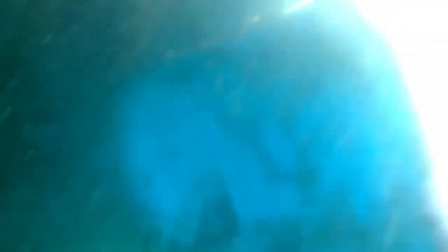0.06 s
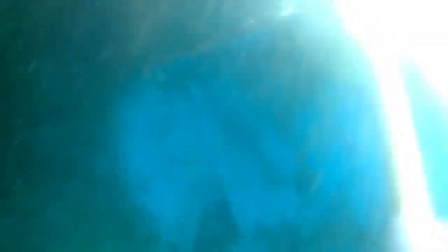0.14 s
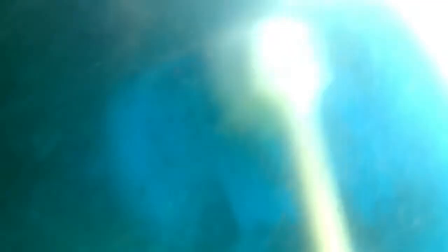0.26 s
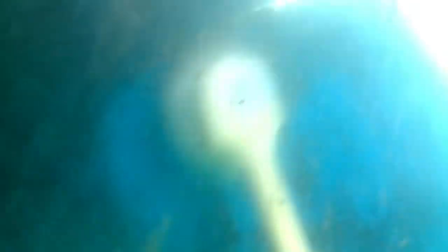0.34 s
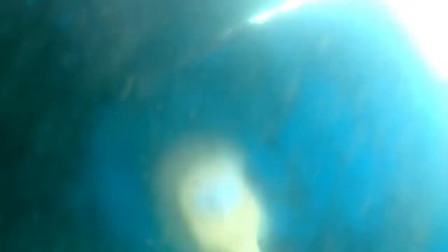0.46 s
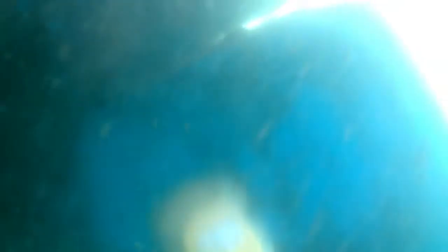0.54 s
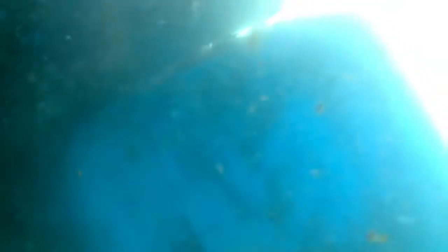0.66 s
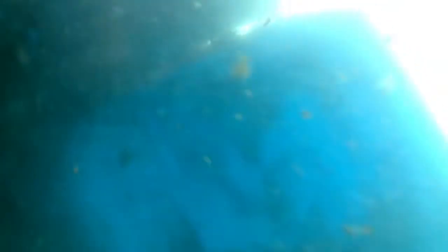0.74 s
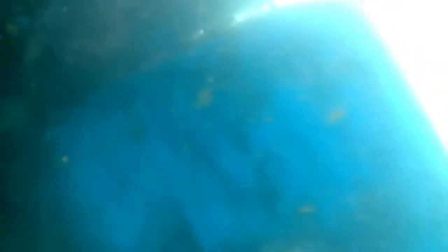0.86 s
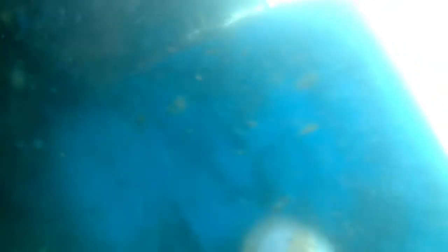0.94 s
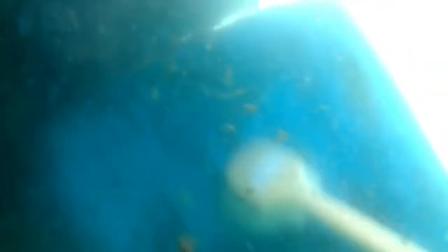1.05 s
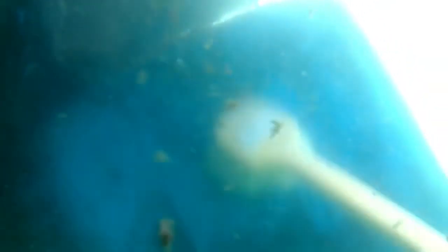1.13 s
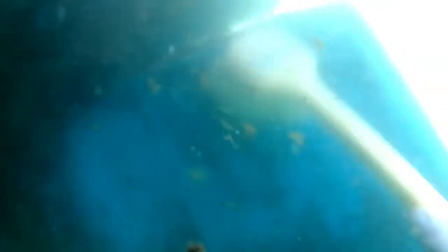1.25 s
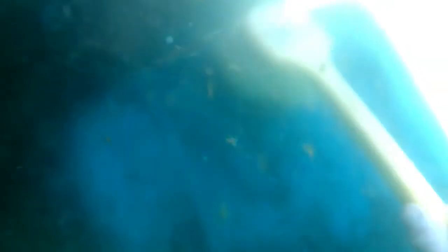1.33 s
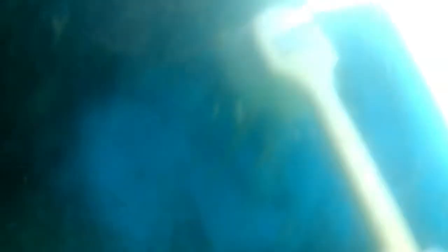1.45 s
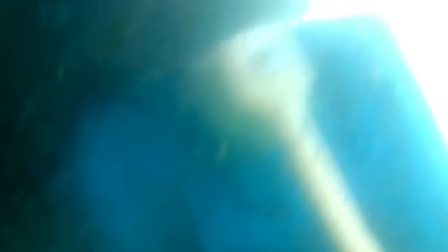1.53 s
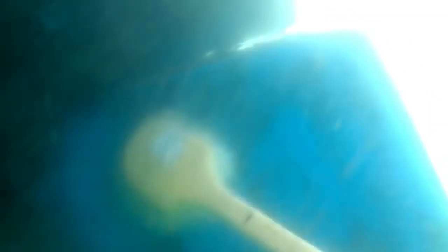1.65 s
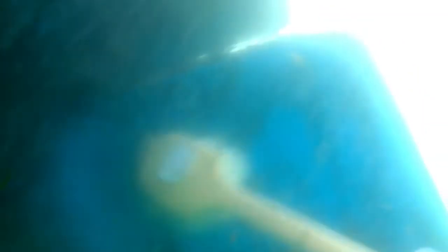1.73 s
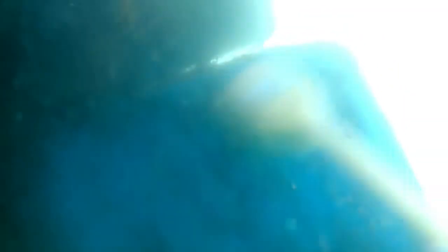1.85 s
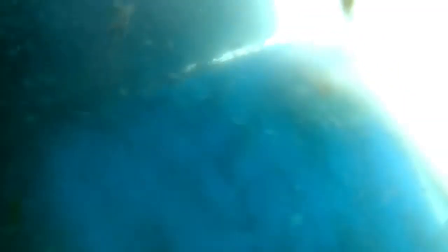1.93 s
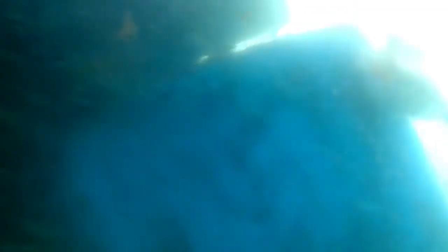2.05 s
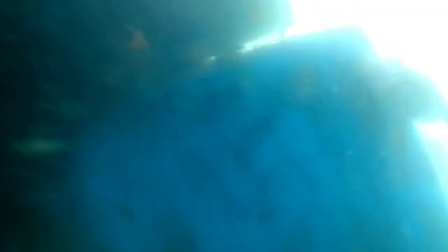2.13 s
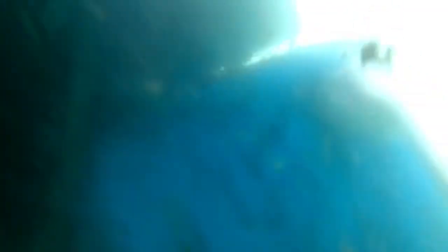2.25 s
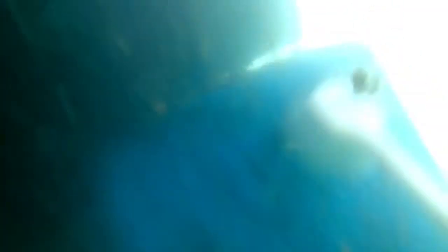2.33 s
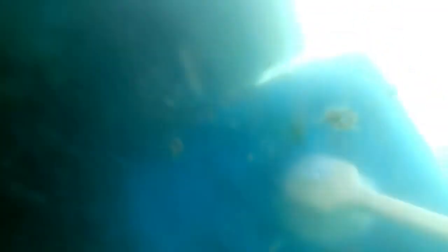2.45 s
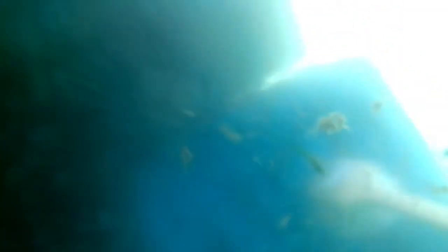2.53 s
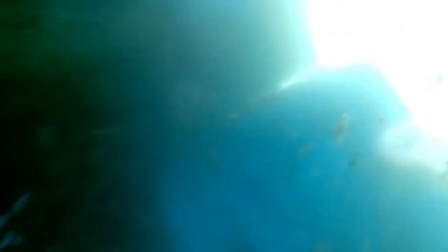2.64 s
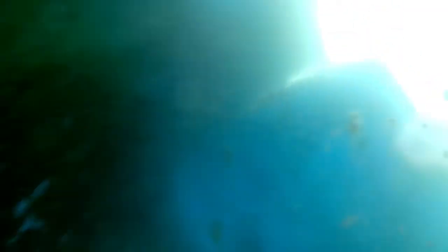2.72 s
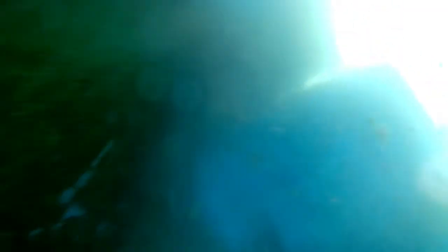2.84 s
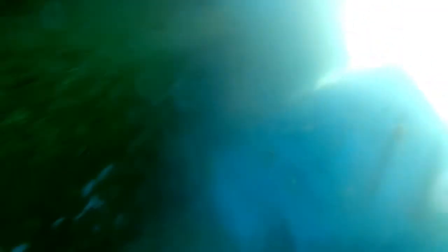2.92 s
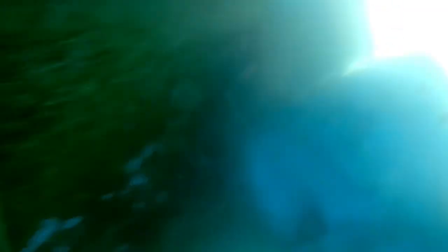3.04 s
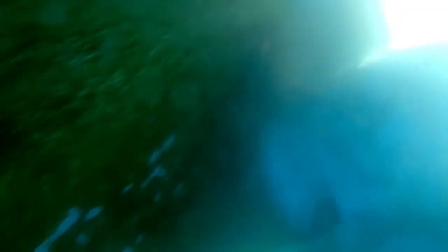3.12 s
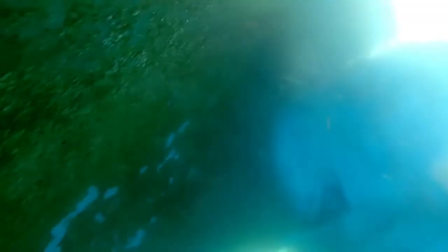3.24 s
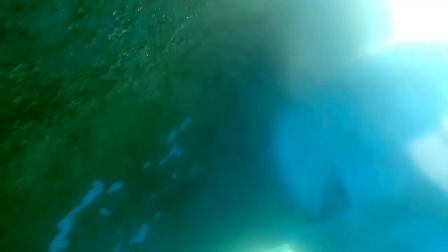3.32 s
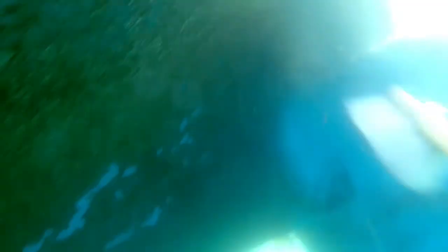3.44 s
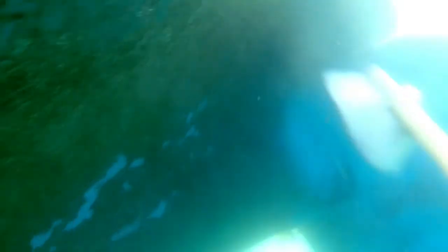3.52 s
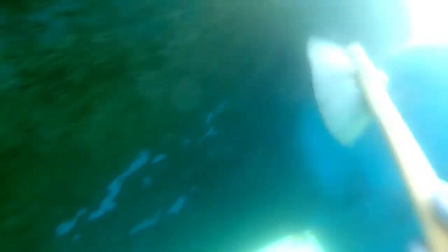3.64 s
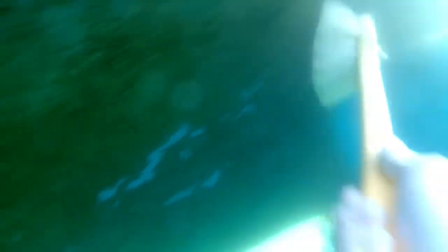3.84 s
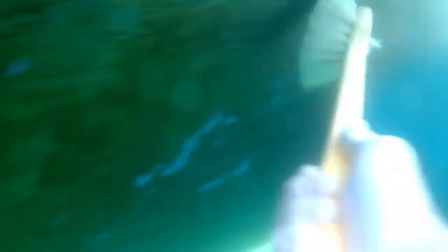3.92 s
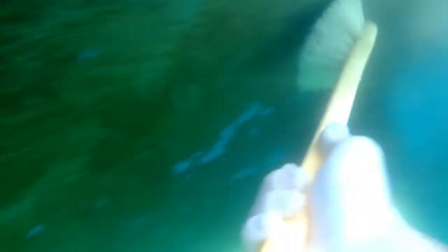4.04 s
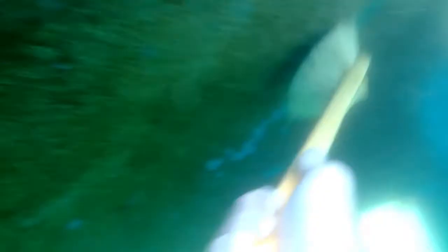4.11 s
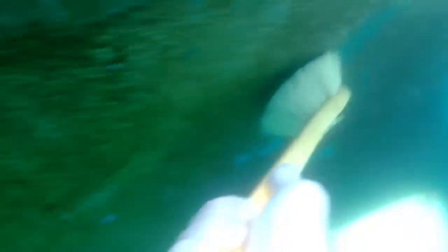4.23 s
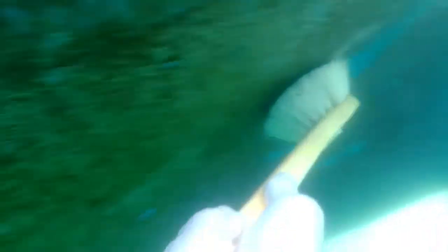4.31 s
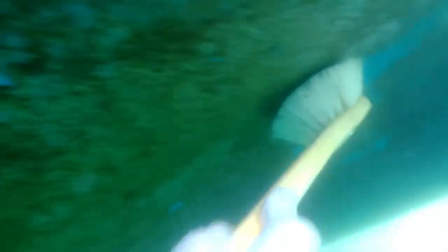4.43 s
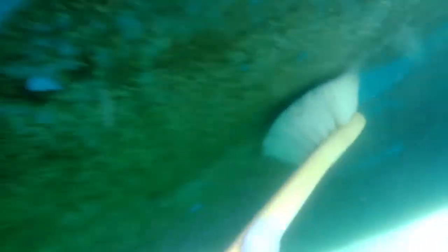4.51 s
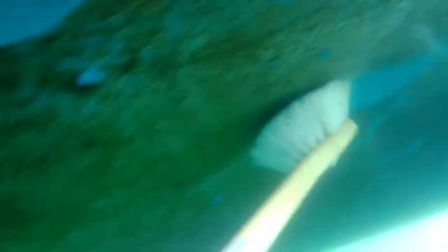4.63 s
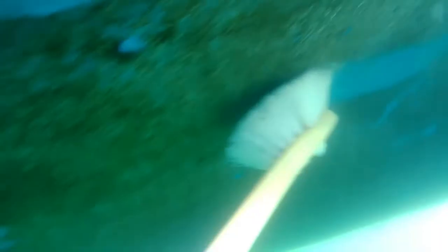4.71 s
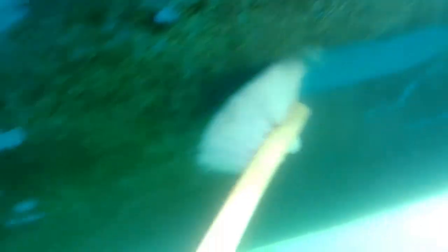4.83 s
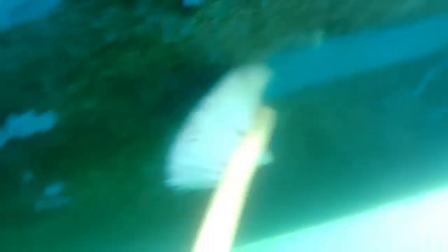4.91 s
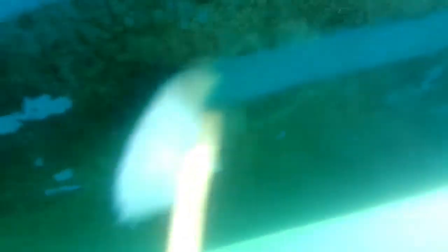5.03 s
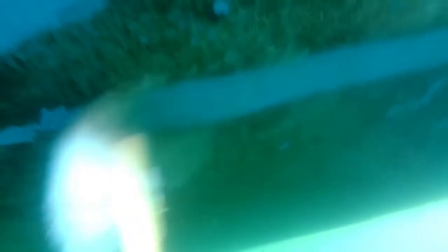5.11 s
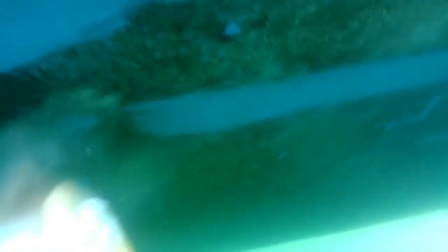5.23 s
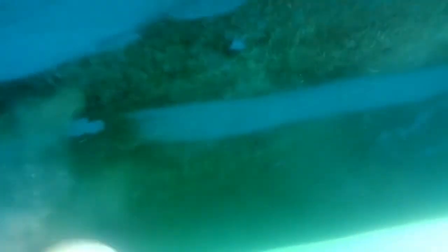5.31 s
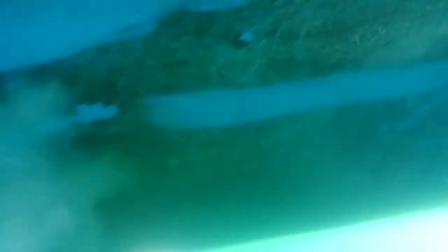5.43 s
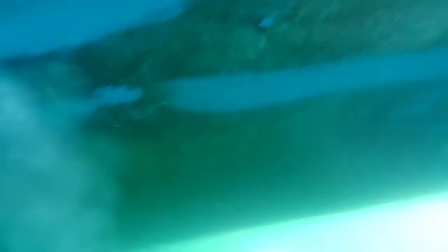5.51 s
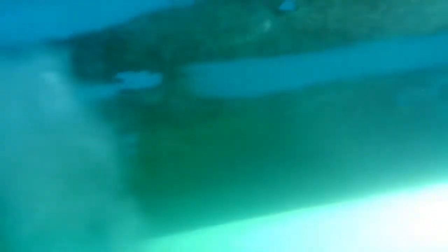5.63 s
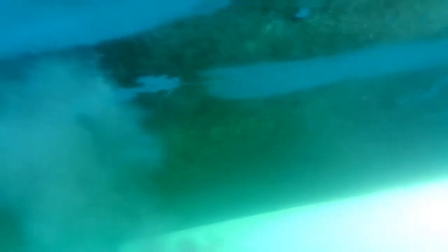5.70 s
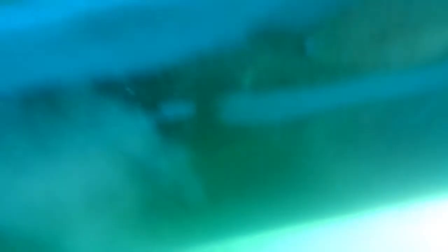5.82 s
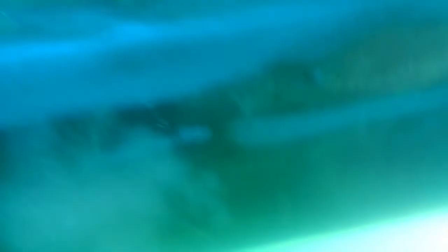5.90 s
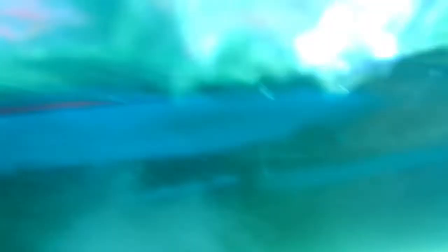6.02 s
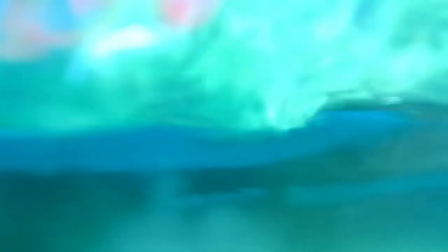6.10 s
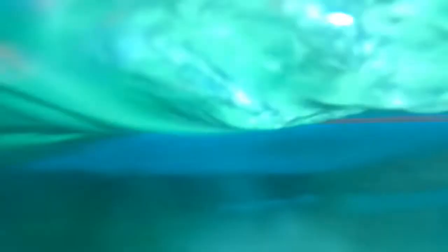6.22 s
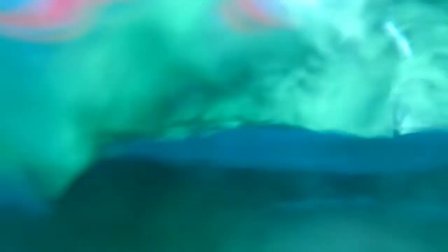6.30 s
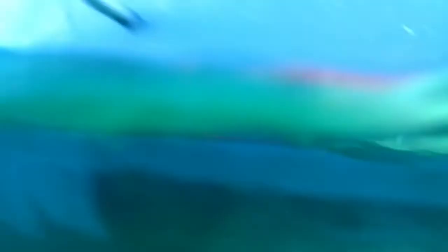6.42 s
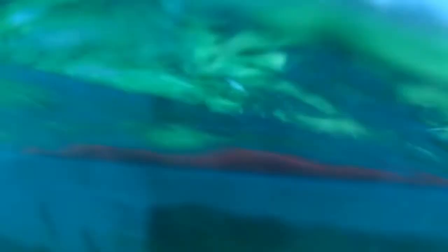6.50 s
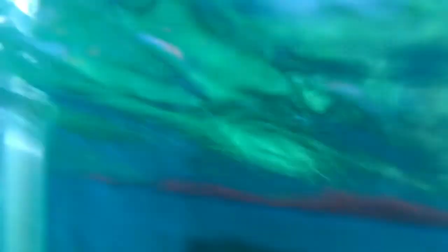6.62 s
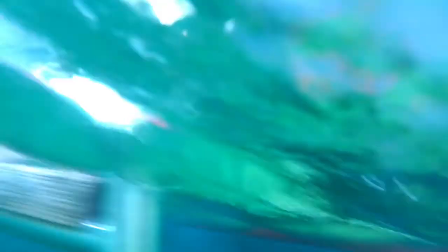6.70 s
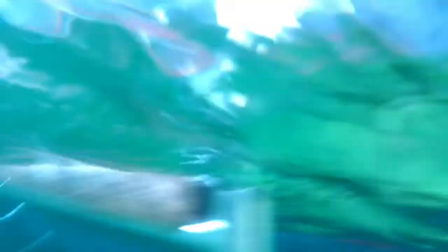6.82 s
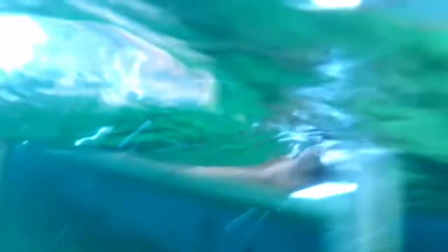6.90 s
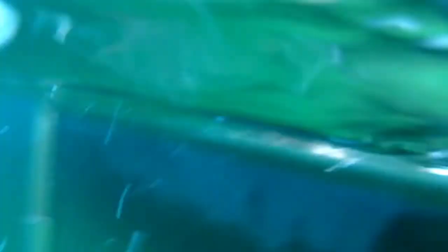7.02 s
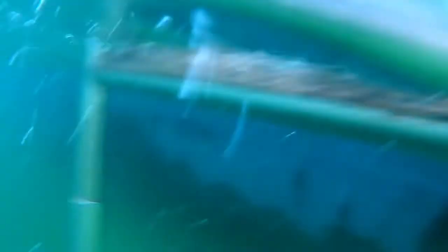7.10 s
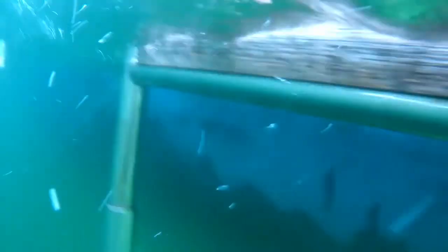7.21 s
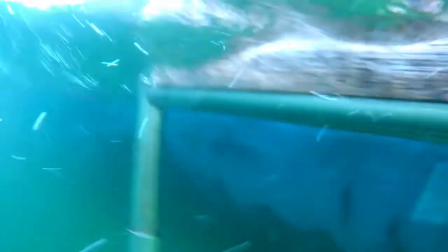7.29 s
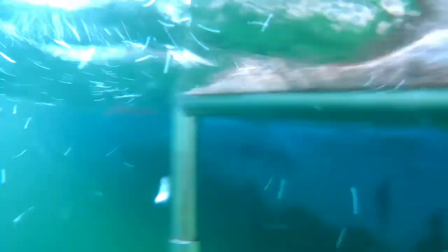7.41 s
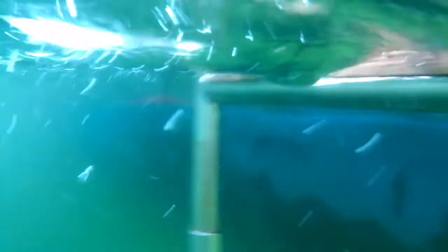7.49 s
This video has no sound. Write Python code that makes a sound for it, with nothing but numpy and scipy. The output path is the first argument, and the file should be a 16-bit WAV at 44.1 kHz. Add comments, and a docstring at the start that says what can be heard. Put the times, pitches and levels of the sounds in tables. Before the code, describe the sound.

From the start, a low, uneven pressure rumble sways against a camera housing underwater. A hand brush swishes dully over a boat hull from 0.1 to 0.6 s, with faint grainy hiss, a soft shove, a round bubble note at 0.2 s and light bumps to 0.65. A fainter stroke follows from 1 to 1.8 s, then near quiet. Around 2.6-2.9 s come small ticks, thuds and crunchy scrapes; longer soft strokes run from 3 to 4.4 s with low bubble blips. Light knocks and weak hiss occur at 4.5-5.4 s. From 5.7 s waves slosh and spray over the rising camera, with a sharp knock and slam at 6.07. The loudest burst of hard clacks, slosh and drops hits at 6.6-6.7 s. It ebbs, then slaps and a bright crack land at 7.2-7.3 s, with high bubble pings and fading froth. Everything is boxy and muffled, with thin mirrored treble sizzle.

```python
"""A hand brush scrubs a boat hull in spells, heard from a small camera under water that then rises to the surface.
From the start bristle grains swish and hiss, scrapes crunch, bubbles ring and water sways against the housing.
Blows set the housing's modes clacking: a few knocks early on, and the loudest late, among the breaking waves.
Those late waves bring slosh, bursting drops and tinkling froth.
Throughout, the camera holds each sample at 8 kHz, mirroring the dull sound into a thin treble sizzle."""
import sys
import numpy as np
from scipy import signal
from scipy.fft import rfft
from scipy.io import wavfile

SR = 44100
rng = np.random.default_rng(int(sys.argv[2]) if len(sys.argv) > 2 else 0)


def wrap_up_sound(samples):
    """Save the sound to the file named by the first command line argument, as 16-bit audio."""
    columns = np.atleast_2d(samples).T
    # keep every value between -1 and 1, then stretch to whole-number steps
    tamed = np.clip(columns, -1, 1)
    steps = np.round(tamed * 32767).astype(np.int16)
    wavfile.write(sys.argv[1], SR, steps)


N = 332953
T = np.arange(N) / SR

# strength of the flow past the moving camera: (time [s], relative level [dB])
FLOW = [(0, -20), (0.15, -25), (0.33, -32), (0.57, -25), (0.92, -31.5), (1.17, -27), (2.45, -32.5),
        (3.05, -26), (4.3, -31.5), (4.6, -25.5), (5.33, -29.5), (5.62, -21), (5.9, -20.5), (6.02, -13.5),
        (6.2, -29), (6.5, -22.5), (6.65, -22.5), (7.55, -25.5)]
# colour of the slow pressure swings: (frequency [Hz], relative level [dB])
SWAY_COLOUR = [(3, -19), (8, 1.5), (14, 8), (24, -4), (40, -9), (65, -24), (120, -36.5), (250, -57)]
# colour of the small eddies: (frequency [Hz], relative level [dB])
EDDY_COLOUR = [(40, -4.5), (70, 12), (130, 0.5), (230, -2.5), (400, -21)]
SWAY_DB = 4  # pressure swings, relative to the flow
# eddy level at a usual flow [dB], that flow [dB], and eddy dB gained per dB of flow
EDDY_DB, EDDY_FLOW_DB, EDDY_GROWTH = -47.5, -27, 1.54

# waves breaking over the camera:
# (start [s], relative slosh level [dB], relative spray level [dB], rise [s], decay time constant [s])
WAVES = [(5.728, -39, -40.5, 0.046, 0.29), (5.87, -42, -37.5, 0.019, 0.095),
         (6.0, -33.5, -34.5, 0.054, 0.2), (6.195, -36.5, -40, 0.028, 0.18),
         (6.59, -23.5, -32.5, 0.028, 0.074), (6.735, -30.5, -53.5, 0.034, 0.19),
         (7.13, -34, -40, 0.11, 0.1), (7.49, -50.5, -62, 0.03, 0.15)]
# colour of the sloshing water: (frequency [Hz], relative level [dB])
SLOSH_COLOUR = [(120, -42.5), (200, -6.5), (295, -8), (381, -1), (426, -5), (542, 6.5), (654, -17.5),
                (705, -24.5), (1050, -27), (1200, -39), (1560, -45), (2640, -120)]
# colour of the bursting drops: (frequency [Hz], relative level [dB])
SPRAY_COLOUR = [(470, 15), (800, 4.5), (907, 6.5), (1230, -14), (1330, 8.5), (1490, -40), (1750, 8),
                (2120, -46.5), (2440, -11.5), (3420, -14.5), (3900, -36), (5070, -44.5), (8580, -120)]

# shoves of water on the housing: (time of the slam [s], relative level [dB], time constant [s])
SHOVES = [(0.153, -11, 0.011), (4.538, -9.5, 0.0031), (5.254, -24, 0.0023), (6.067, -3, 0.0019),
          (6.648, -7.5, 0.0068), (7.221, -2.5, 0.0018)]
# single bubbles: (start [s], peak level [dB], starting pitch [Hz], life [s], pitch rise per life [share])
BUBBLES = [(0.155, -26.5, 444, 0.021, .02), (0.204, -10.5, 462, 0.027, 0.005),
           (1.04, -39, 539, 0.025, 0.012), (1.70, -38, 190, 0.039, 0.034), (1.88, -41, 142, 0.042, 0.037),
           (2.775, -30.5, 174, 0.038, 0.025), (2.982, -39.5, 675, 0.011, 0.04),
           (3.293, -21.5, 94.3, 0.033, 0.036), (3.906, -24.5, 493, 0.018, 0.036),
           (4.211, -33, 617, 0.019, 0.049), (5.899, -27, 670, 0.013, 0.014),
           (6.621, -24, 588, 0.039, 0.013), (6.645, -5, 846, 0.004, 0.024),
           (6.734, -20.5, 418, 0.006, 0.026), (6.825, -27.5, 375.4, 0.038, 0.014),
           (7.253, -26.5, 1825, 0.0082, 0.041), (7.327, -35, 1720, 0.012, 0.015),
           (7.362, -36, 1065, 0.035, 0.12)]

# knocks and slaps on the housing: (start [s], relative level [dB],
# contact frequency [Hz], low is a soft bump and high a hard tick, length [factor], splash [share of power, 0-1])
KNOCKS = [(0.096, -33, 170, 1, 0.3), (0.506, -25, 108.3, 0.45, 0), (0.632, -31, 130, 0.71, 0.8),
          (2.319, -43.5, 2800, 0.91, 0.7), (2.621, -37, 1670, 1, 0.03), (2.751, -38, 1540, 0.99, 0.75),
          (2.769, -22.5, 250, 0.48, 0.16), (2.794, -24, 150, 1, 0.12), (2.841, -41, 1900, 1, 0.47),
          (2.904, -49, 2400, 0.56, 0.2), (4.5, -29, 4080, 0.6, 0.14), (4.899, -32.5, 330, .95, 0.22),
          (4.926, -43, 4000, 0.74, .6), (5.231, -43, 1770, 1, .2), (5.249, -28.5, 220, 1, 0.06),
          (5.326, -46.5, 3520, .95, 0.9), (5.385, -29, 220, 1, 0.08), (5.63, -51, 80, 0.48, 0.2),
          (5.785, -32, 1590, 0.26, 0), (5.802, -31.5, 1390, 0.28, 0.4), (5.987, -32.5, 600, 0.97, 0.3),
          (6.066, -10.5, 664, 1, .02), (6.076, -18, 1370, 0.77, 0.06), (6.2, -18.5, 370, 1, 0.2),
          (6.359, -27, 720, 0.86, 0.07), (6.584, -17, 696, 0.87, 0.15), (6.618, 0, 970, 0.92, 0.04),
          (6.629, -14, 3120, 0.28, 0.1), (6.644, -7.5, 480, 0.61, .12), (6.663, -22, 300, 0.71, 0.7),
          (6.709, -15.5, 576, .5, 0.29), (7.043, -23, 450, 0.18, 0.02), (7.158, -19.5, 1200, 0.32, .46),
          (7.202, -25, 250, 0.69, 0.6), (7.221, -11.5, 1670, 0.3, 0.8), (7.254, -25.5, 1300, 0.45, 0.16),
          (7.305, -3.5, 2740, 0.56, 0.05), (7.373, -24.5, 520, 0.96, 0.19)]
# housing modes before detuning: (frequency [Hz], 60 dB decay at length factor 1 [s], level within its register [dB])
HOUSING_MODES = [(114, 0.0024, 12.5), (213, 0.021, -18), (527, 0.038, 17.5), (546.7, 0.043, 32),
                 (700, 0.012, -17), (835, 0.0028, -20), (999, 0.071, -17), (1240, 0.039, -13.5),
                 (1760, 0.029, 10), (1873, 0.03, 20), (2130, 0.048, -13), (2870, 0.023, -10)]
# edges of the housing's four registers, thud, body, ring and crack: (frequency [Hz])
REGISTER_EDGES = [70, 380, 780, 1600, 2800]
# how readily thud, body, ring and crack answer a blow: (relative level [dB])
REGISTER_ANSWER = [-2.0, -0.5, -10, 0.1]
# fall of a blow's force on either side of its contact frequency
ABOVE_CONTACT_DB_PER_OCT, BELOW_CONTACT_DB_PER_OCT = 15, 3
# share by which the crack rises per octave of contact frequency above the usual one
CRACK_RISE_PER_OCT, USUAL_CONTACT_HZ = 0.11, 1300

# crunchy scrapes and squirts, and the brief crack that goes with the knock at 2.62 s: (start [s], length [s],
# rms level [dB], centre frequency [Hz])
SCRAPES = [(0.01, 0.032, -54.5, 1370), (0.141, 0.1, -40, 339), (1.764, 0.11, -44.5, 485),
           (2.405, 0.11, -68.5, 2670), (2.616, 0.011, -35.5, 1480), (2.748, 0.059, -37, 423),
           (2.761, 0.17, -66.5, 2220), (2.8, 0.19, -45.5, 212), (2.851, 0.091, -45.5, 400),
           (4.471, 0.035, -55.5, 2400), (4.493, 0.049, -53, 630), (4.495, 0.039, -49.5, 1600),
           (4.578, 0.65, -65.5, 1810), (4.598, 0.57, -69, 2720), (5.777, 0.052, -41.5, 1570),
           (6.027, 0.14, -41.5, 1740), (6.151, 0.27, -56, 1770), (6.19, 0.094, -50, 980),
           (6.57, 0.038, -34.5, 1960), (6.688, 0.029, -39, 1890), (6.703, 0.0106, -24, 1060),
           (7.187, 0.07, -43.5, 2250), (7.274, 0.056, -38, 1950)]

# spells of scrubbing:
# (start [s], time from start to release [s], relative swish level [dB], bristle hiss level [dB])
STROKES = [(0.09, 0.51, -39.5, -57), (0.954, 0.8, -47.5, -62.5), (1.904, 0.067, -48.5, -73),
           (3, 0.63, -41.5, -63.5), (3.707, 0.69, -44, -60.5), (4.53, 0.41, -66, -59.5)]
# colour of the swish against the hull: (frequency [Hz], relative level [dB])
HULL_COLOUR = [(110, -7), (180, -6), (259, -11), (337, -2), (414, -7), (452, -1.5), (478, 0), (521, -2),
               (699, -19), (813, -19), (931, -44.5), (1140, -27.5), (1200, -51), (1560, -77), (2640, -120)]
# colour of the hissing bristle tips: (frequency [Hz], relative level [dB])
BRISTLE_COLOUR = [(500, -2), (850, 2.5), (929, -0.5), (1210, -7), (1340, 1.5), (1470, -6), (1590, -1.5),
                  (2610, -11.5), (3520, -17.5), (3900, -97), (5070, -38), (8580, -120)]
STROKE_ATTACK_S, STROKE_RELEASE_S = 0.11, 0.23
# water that keeps brushing past the hull between spells, on the scales of the spells' swish and hiss
WASH_SWISH_DB, WASH_HISS_DB = -58, -62

CAMERA_HZ, TOP_HZ = 8000, 15800  # sampling rate, and the top of what is let through


def undb(db):
    """Decibels to gain."""
    return 10 ** (np.asarray(db) / 20)


def unit(x):
    """Scale to rms 1."""
    return x / np.sqrt(np.mean(x ** 2) + 1e-18)


def add(out, start, x):
    """Mix x into out from a start time in seconds."""
    i = max(int(start * SR), 0)
    out[i:i + len(x)] += x[:max(N - i, 0)]


def band(x, lo_hz, hi_hz):
    """Band-pass."""
    return signal.sosfilt(signal.butter(3, [lo_hz, hi_hz], "band", fs=SR, output="sos"), x)


def colour(x, points):
    """Weight the spectrum of x by a colour table, falling steeply past both ends; rms 1."""
    hz, db = np.transpose(points)
    octave = np.log2(np.maximum(np.fft.rfftfreq(N, 1 / SR), 1))
    known = np.log2(hz)
    beyond = np.abs(octave - np.clip(octave, known[0], known[-1]))
    weight = undb(np.interp(octave, known, db) - 25 * beyond)  # 25 dB per octave past the ends
    return unit(np.fft.irfft(rfft(x) * weight, N))


def walk(rate):
    """Smooth random wander with a spread near 1, taking rate steps per second."""
    steps = rng.standard_normal(2048)
    return 1.2 * np.interp(T * rate, np.arange(len(steps)), steps)


def grains(rate, spread_db):
    """Tiny random impulses of uneven size, rate per second on average."""
    hit = rng.random(N) < rate / SR
    sign = np.sign(rng.standard_normal(N))
    return hit * sign * undb(spread_db * np.minimum(rng.exponential(size=N), 5))


def swell(start, attack_s, hold_s, release_s):
    """Envelope that rises, starts to die away hold_s after its start, and fades exponentially."""
    age = T - start
    return np.clip(age / attack_s, 0, 1) * np.exp(-np.maximum(age - hold_s, 0) / release_s)


def flow():
    """The moving camera feels slow pressure swings, and small eddies that grow faster than the flow."""
    flow_db = np.interp(T, *np.transpose(FLOW))
    swings = colour(rng.standard_normal(N), SWAY_COLOUR)
    eddies = colour(rng.standard_normal(N) * undb(2.5 * walk(19)), EDDY_COLOUR)
    eddy_db = EDDY_DB + EDDY_GROWTH * (flow_db - EDDY_FLOW_DB)
    return undb(flow_db + SWAY_DB) * swings + undb(eddy_db) * eddies


def bubble(hz, life, rise):
    """A pocket of air pinches off, swells into a ring and dies away, rising in pitch; peak near 1."""
    age = T[:int(4 * life * SR)] / life
    envelope = age ** 1.2 * np.exp(-3.6 * age)
    return envelope / envelope.max() * np.sin(2 * np.pi * hz * life * age * (1 + rise * age / 2))


def froth(rate, cycles, spread_db, low_hz=600, high_hz=2250):
    """A swarm of small bubbles of mixed pitch and strength, each living for a set number of cycles."""
    out = np.zeros(N)
    for when, size, strength in rng.random((int(rate * N / SR), 3)):
        hz = low_hz + (high_hz - low_hz) * size
        gain = undb(-spread_db * np.log(max(strength, 0.02)))
        add(out, when * N / SR, gain * bubble(hz, cycles / hz, rise=0.021))
    return unit(out)


def surface():
    """Water sloshes round the camera in surges; drops burst on it and froth tinkles."""
    slosh = spray = 0
    for start, slosh_db, spray_db, rise_s, decay_s in WAVES:
        wave = swell(start, rise_s, rise_s, decay_s)
        slosh = np.hypot(slosh, wave * undb(slosh_db))
        spray = np.hypot(spray, wave * undb(spray_db))
    surge = undb(1.5 * walk(28))
    gurgle = colour(grains(rate=1100, spread_db=-2.0) * surge, SLOSH_COLOUR)
    drops = colour(grains(rate=1400, spread_db=4.0) * surge, SPRAY_COLOUR)
    fizz = unit(drops + undb(-2.5) * froth(rate=480, cycles=16.5, spread_db=6.5))
    return undb(-2.0) * (slosh * gurgle + spray * fizz)


def shoves():
    """Suction builds, the water slams back, and the pressure eases off."""
    out = np.zeros(N)
    for slam, db, tau in SHOVES:
        age = (T - slam) / tau
        out += undb(db) * np.tanh(age / 0.54) * np.exp(-np.abs(age))
    return out


def bubbles():
    """Single bubbles, each a pocket of air ringing at its own pitch."""
    out = np.zeros(N)
    for start, db, hz, life, rise in BUBBLES:
        add(out, start, undb(db) * bubble(hz, life, rise))
    return out


def contact(contact_hz):
    """Share of a blow that goes to each register: a soft, slow contact cannot drive the high ones."""
    edges = np.log2(REGISTER_EDGES)
    above = (edges[:-1] + edges[1:]) / 2 - np.log2(contact_hz)  # octaves
    fall = np.hypot(undb(ABOVE_CONTACT_DB_PER_OCT * above), undb(-BELOW_CONTACT_DB_PER_OCT * above))
    force = undb(REGISTER_ANSWER) / fall
    return force / np.linalg.norm(force)


def register_modes(t, lo, hi, shift, tuning, length):
    """Sum of the decaying housing modes that lie in one register."""
    modes = np.zeros(len(t))
    for (hz, t60, db), detune in zip(HOUSING_MODES, tuning):
        if lo <= hz < hi:  # a mode above the top edge stays silent
            decay = np.exp(-np.log(1000) * t / (t60 * length))
            modes += undb(db) * np.sin(2 * np.pi * hz * detune * shift * t) * decay
    return modes


def knocks():
    """A blow and a brief splatter ring the housing, and displaced water hisses after; contact balances registers."""
    out, t = np.zeros(N), T[:SR // 6]
    head = SR // 50  # levels are set over the first fiftieth of a second
    splatter, splatter_s = 0.6, 0.0051  # strength against the blow, decay at length factor 1
    splash_s, splash_rise_s = 0.013, 0.00023  # decay at length factor 1, rise
    for start, db, contact_hz, length, wet in KNOCKS:
        length = max(length, 0.2)
        push = rng.standard_normal(len(t)) * np.exp(-t / (splatter_s * length))
        push *= splatter / np.linalg.norm(push)
        push[0] += 1  # the blow itself
        water = rng.standard_normal(len(t)) * np.exp(-t / (splash_s * length))
        water *= 1 - np.exp(-t / splash_rise_s)
        tuning = 1 + 0.035 * rng.standard_normal(len(HOUSING_MODES))
        # a harder contact rings the top register a little higher
        shifts = [1, 1, 1, 1 + CRACK_RISE_PER_OCT * np.log2(contact_hz / USUAL_CONTACT_HZ)]
        registers = zip(REGISTER_EDGES, REGISTER_EDGES[1:], contact(contact_hz), shifts)
        for lo, hi, share, shift in registers:
            modes = register_modes(t, lo, hi, shift, tuning, length)
            ring = band(signal.fftconvolve(push, modes)[:len(t)], lo * shift, hi)
            splash = band(water, lo, hi)
            dry_part = np.sqrt(1 - wet) * ring / np.std(ring[:head])
            wet_part = np.sqrt(wet) * splash / np.std(splash[:head])
            add(out, start, share * undb(db - 8.0) * (dry_part + wet_part))
    return out


def scrapes():
    """Bristles or water drag over an edge: a brief swell of grains in one resonance."""
    width = 0.34  # of the resonance, as a share of its centre
    out = np.zeros(N)
    for start, length, db, hz in SCRAPES:
        t = T[:int(length * SR)]
        # grain size changes about every millisecond
        size_db = 7.5 * np.minimum(rng.exponential(size=1024), 3.1)
        size = np.repeat(undb(size_db), SR // 1000)[:len(t)]
        noise = size * rng.standard_normal(SR)[:len(t)]
        crunch = band(noise, hz / (1 + width / 2), hz * (1 + width / 2))
        add(out, start, undb(db) * unit(crunch * np.sin(np.pi * t / length)))
    return out


def brush():
    """Bristles catch and flick free in tufts: the swish booms dully against the hull and the tips hiss."""
    swish, hiss = undb(WASH_SWISH_DB), undb(WASH_HISS_DB)
    for start, length, swish_db, hiss_db in STROKES:
        effort = swell(start, STROKE_ATTACK_S, length, STROKE_RELEASE_S)
        swish = np.hypot(swish, effort * undb(swish_db))
        hiss = np.hypot(hiss, effort * undb(hiss_db))
    tufts = undb(1.4 * walk(45))
    hull = colour(grains(rate=2500, spread_db=1.0) * tufts, HULL_COLOUR)
    tips = colour(grains(rate=5000, spread_db=1.0) * tufts, BRISTLE_COLOUR)
    return undb(1.5) * swish * hull + hiss * tips


def scene():
    """Everything reaches one microphone inside the housing, after a 10 ms fade-in."""
    fade = np.minimum(T / 0.01, 1)
    scrubbing = brush() + scrapes()
    water = surface() + flow() + shoves() + bubbles()
    return (fade * (scrubbing + water + knocks()))[None]


def record(dry):
    """Sample at a low rate, clip at full scale, hold each sample until the next, and cut the top."""
    common = np.gcd(CAMERA_HZ, SR)
    slow = signal.resample_poly(dry, CAMERA_HZ // common, SR // common, axis=1, padtype="edge")
    slow = np.clip(slow, -1, 1)
    held = slow[:, np.arange(N) * CAMERA_HZ // SR]  # the steps mirror the low sound into the treble
    return signal.sosfilt(signal.ellip(8, 0.2, 70, TOP_HZ, fs=SR, output="sos"), held)


dry = scene()
out = record(dry)
wrap_up_sound(out)
```